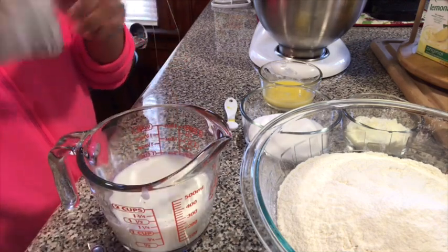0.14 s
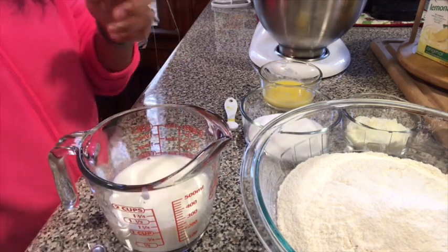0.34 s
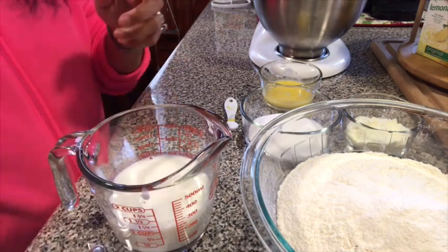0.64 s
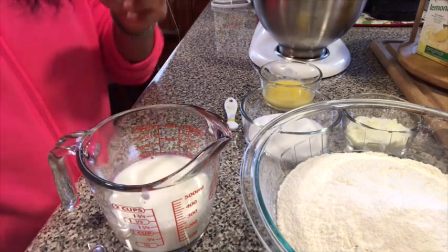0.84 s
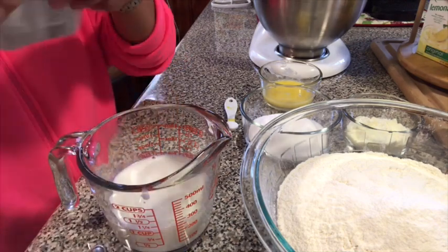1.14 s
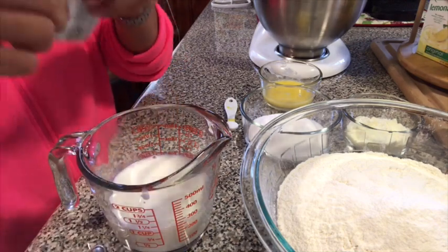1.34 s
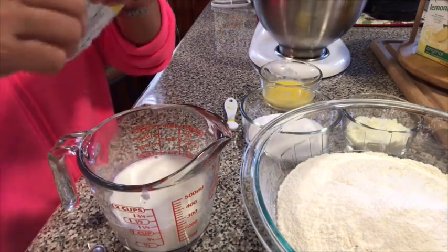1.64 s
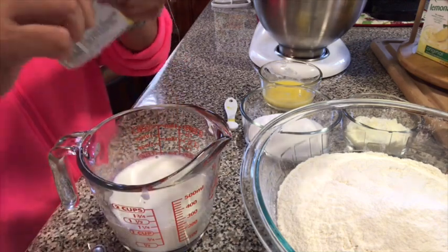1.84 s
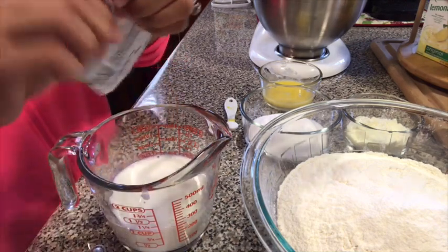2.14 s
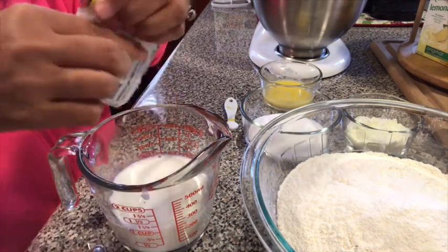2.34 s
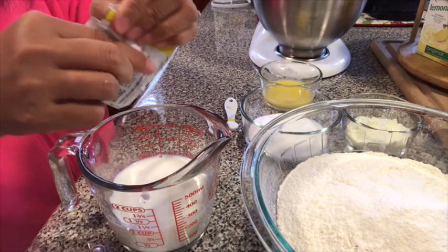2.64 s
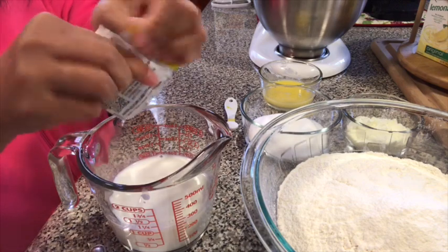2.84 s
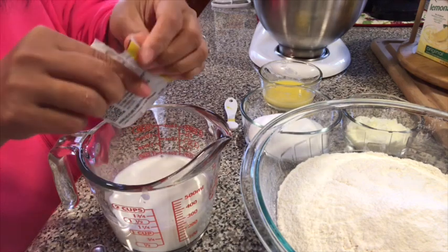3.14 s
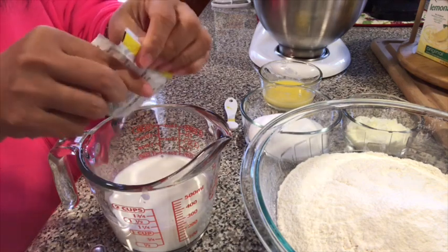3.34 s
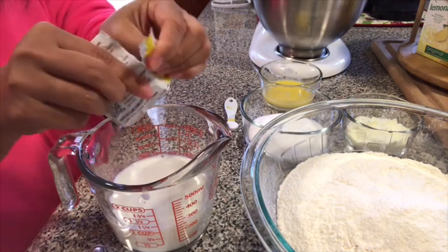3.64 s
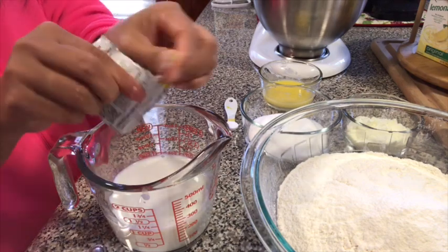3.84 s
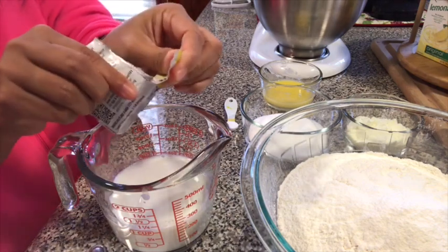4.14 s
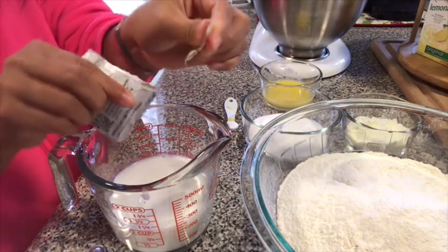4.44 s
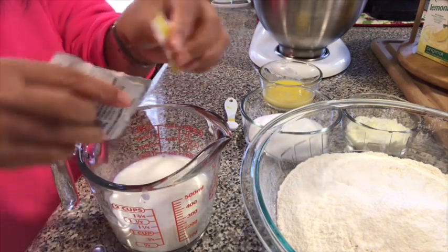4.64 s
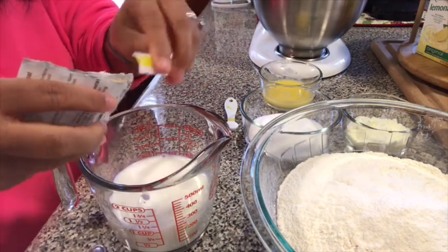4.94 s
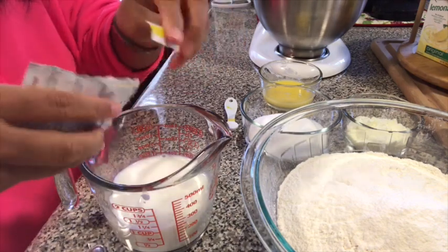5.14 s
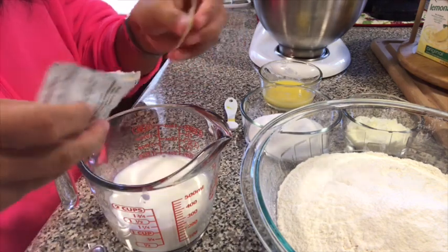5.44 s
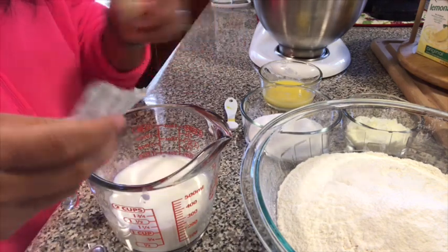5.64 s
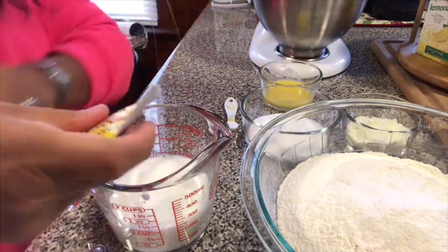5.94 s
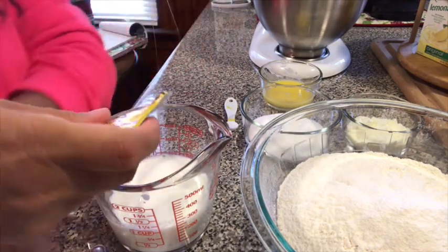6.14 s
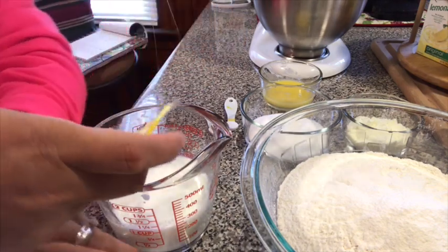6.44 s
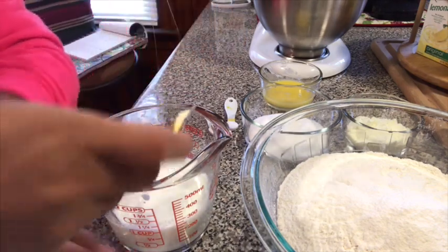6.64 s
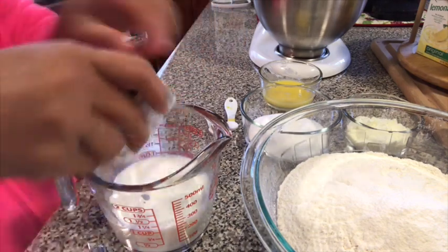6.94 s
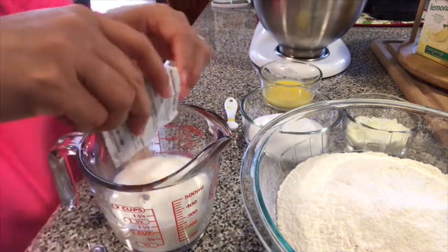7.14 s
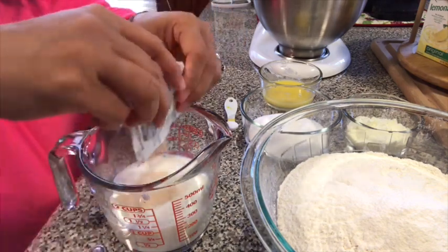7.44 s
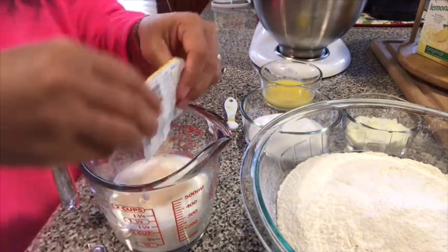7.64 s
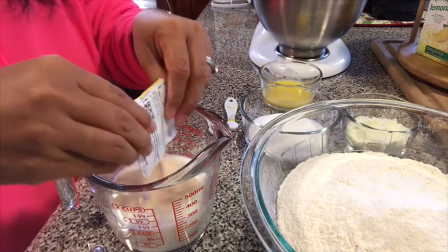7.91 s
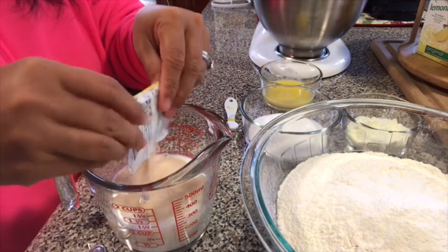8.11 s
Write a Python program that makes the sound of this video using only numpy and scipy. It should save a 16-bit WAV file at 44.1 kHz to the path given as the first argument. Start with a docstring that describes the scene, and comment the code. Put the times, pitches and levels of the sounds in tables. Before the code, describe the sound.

A paper packet is shaken hard and crackles sharply close by, then is pinched and torn in a quiet, humming kitchen before granules hiss out.

```python
"""A foil-lined paper packet is shaken, pinched and torn open close by in a quiet kitchen: creases ring the
paper as struck panels, clumps of clicks make the rustle, and three early shakes push out puffs of noise.
A faint low tone soon rises and a whine follows, to return later. In the second half a dull rumble of shaped
noise, perhaps traffic outside, swells; at the end dense ticks hiss as granules pour into a jug of milk.
Throughout, an appliance hums as a sine and its octave, beating slowly with a distant engine's gliding tone."""
import sys
import numpy as np
from scipy import signal
from scipy.fft import rfft, irfft
from scipy.io import wavfile

SR = 44100
rng = np.random.default_rng(int(sys.argv[2]) if len(sys.argv) > 2 else 0)


def wav_record(signal):
    """Record a signal, one row per channel, as 16-bit PCM in the file named by sys.argv[1]."""
    frames = np.transpose(np.atleast_2d(signal))
    bounded = np.clip(frames, -1, 1)
    # unit amplitude maps onto the largest positive 16-bit level
    quanta = np.round(bounded * 32767).astype(np.int16)
    wavfile.write(sys.argv[1], SR, quanta)


N = 364707

# louder creases snapping: (time [s], reference level [dB], panel pitch [Hz], treble re reference [dB])
CREASE_SNAPS = [(0.011, -41, 7000, -2.5), (0.0703, -36, 1600, -14), (0.1239, -39, 3200, -12),
                (0.2052, -40, 1400, -8), (0.2311, -25.5, 1640, -7.5), (.246, -17.5, 4200, -7),
                (0.2541, -14.5, 5400, -23.5), (0.3003, -23, 1700, -12), (0.3117, -19, 3500, -2),
                (0.3165, -20, 2090, -3), (.3241, -27, 3830, -12), (.3284, -15.5, 3960, -6),
                (0.3327, -6, 5270, -22), (0.414, -26, 1299, -9), (0.4386, -32, 3600, -12),
                (0.4501, -11, 4000, -3), (0.4539, -16, 3620, -12), (0.517, -23, 3200, -12),
                (0.5237, -17, 3330, -12), (0.5278, -21, 3600, -3.5), (0.5312, -8.5, 1820, -12),
                (.5424, -12, 2450, -3), (.5835, -36.5, 1900, -3), (0.6181, -25.5, 1420, -13),
                (0.6404, -21, 6300, -13.5), (0.657, -27, 4170, -12), (0.7166, -31, 2400, -14),
                (.7259, -21, 2050, -5), (0.7355, -12, 2200, -12), (.7429, -4.5, 3030, -6),
                (0.7488, -16.5, 3130, -6), (0.8193, -25.5, 1640, -3), (0.8454, -27, 1350, -12),
                (1.076, -44, 2390, -16), (1.115, -33.5, 2500, 2), (1.2653, -42.5, 1840, -14),
                (1.3012, -30.5, 2000, -18), (1.3455, -30, 2600, 7.5), (1.367, -36.5, 3000, -10),
                (1.384, -33, 5600, -14), (1.4876, -28.5, 1430, -8.5), (1.6596, -44, 2360, -13),
                (1.7555, -39.5, 2570, -6), (1.7816, -28.5, 2230, -14), (1.8164, -27, 1970, -15),
                (1.9005, -32, 3200, -2), (1.9644, -15.5, 2500, -15), (2.1537, -42, 2520, -11),
                (2.2615, -33.5, 2440, -14.5), (2.2812, -35, 6800, -0.5), (2.2979, -28.5, 2130, -15.5),
                (2.36, -44, 5600, -4.5), (2.4984, -29.5, 3000, -12.5), (2.507, -11, 3800, -13.5),
                (2.57, -41, 3400, 1), (2.6086, -44.5, 6000, 9), (2.6266, -34, 4860, -10),
                (2.7087, -27.5, 4660, -17), (2.719, -35, 5900, -2), (2.7272, -32, 5200, -12),
                (2.7575, -12.5, 2380, -2.5), (2.7866, -27, 6100, -10), (2.9706, -43, 3400, -0.5),
                (3.053, -44, 5000, -2), (3.3628, -30, 2120, -8), (3.3663, -32.5, 2830, -5),
                (3.4313, -45, 4800, -6), (3.5844, -35, 5560, 4), (3.6376, -43, 6750, 9.5),
                (3.6603, -43, 7400, 11), (3.7274, -30, 5860, -8), (3.7407, -20.5, 5800, 0),
                (3.755, -20, 3540, 1.5), (3.9688, -35, 5560, 3), (3.9775, -42, 5350, -14),
                (3.9877, -44, 4200, 7), (3.9998, -42, 4340, 4.5), (4.013, -37.5, 3900, 4),
                (4.094, -40.5, 5740, 1), (4.119, -45, 5890, -4), (4.1436, -47, 3190, 0),
                (4.1709, -27, 5160, -2), (4.1888, -27, 2750, 3), (4.2247, -29, 2570, -3),
                (4.533, -47, 1890, 4), (5.0988, -51, 6000, 5), (5.284, -51, 2900, -12),
                (5.5689, -40, 2400, -14), (5.5757, -37, 4500, -5), (6.23, -44.5, 3100, -8),
                (6.2376, -38, 5040, -18), (6.4095, -47, 6550, -12), (6.7293, -34, 2590, 0),
                (6.96, -41, 6260, -4), (7.086, -39.5, 2950, -11), (7.1123, -32, 5200, -17),
                (7.3568, -37, 1800, -12.5), (7.422, -37.5, 2710, 1.5), (7.603, -37, 2930, -12),
                (7.6235, -29, 3800, 0.5), (8.0225, -28.5, 3540, -9), (8.0506, -27.5, 1840, -6)]
# resonances of the paper: (frequency [Hz], width [Hz], relative level [dB])
PAPER_MODES = [(2570, 200, 4), (4410, 317, -9), (6380, 630, -6)]
# swells of rustling from shaking, pinching and tearing, and their fading tails;
# rise and fall are never shorter than 0.005:
# (time of the top [s], level [dB], rise [s per 20 dB], fall [s per 20 dB], body re level [dB])
RUSTLE_SWELLS = [(.02, -54, 4, .03, -10.5), (.12, -57.5, 0.2, 0.02, -19), (.24, -39, 0, 0.06, -26),
                 (0.323, -30.5, 0, .05, -5.5), (.452, -42, 0.05, .12, -14),
                 (0.537, -34.5, -0.0144, .055, -2.5), (0.654, -43, -0.08, 0.01, -5),
                 (0.739, -32, 0.02, 0.0421, -0.5), (.8, -50, 0.5, 0.1054, -4), (1.111, -57, 0.1, 0.12, -9),
                 (1.357, -57.5, 0.2, 0.22, -9), (1.488, -64, 0, .08, -6), (1.79, -59, 0.18, 0.2, 0.5),
                 (1.904, -48, 0.05, 0.08, -6.5), (1.97, -56.5, .08, .09, 4), (2.133, -64, 0.18, 0.4, -8),
                 (2.258, -55.5, 0.03, .18, -9), (2.505, -62.5, 0.06, 0.55, -12),
                 (2.735, -53, -0.07, 0.06, -25), (2.767, -38, 0.0457, 0.08, -18),
                 (2.816, -39.5, .1, -0.01, -16.5), (3.134, -67.5, 0.2, -0.1, -23),
                 (3.278, -60.5, 0.05, -1.66, -24), (3.374, -62, 0.13, -0.7, -7),
                 (3.473, -56.5, 0.17, -0.25, -14.5), (3.577, -54, 0.27, -0.18, -23),
                 (3.701, -56.5, 0.23, -0.1, -17.5), (3.754, -41.5, 0.0162, 0.0944, -11),
                 (3.802, -41, 0.0945, -0.09, -25.5), (3.985, -49.5, -0.4, 0.02, -30),
                 (4.178, -49.5, 0.1, 0.0923, -14), (4.221, -38, 0.0528, -0.08, -10.5),
                 (4.659, -74, 0.7, 0.3, -15.5), (4.86, -69, 0, 0.02, -18), (4.953, -69, 0.14, 0.3, -7),
                 (5.163, -73, -0.1, 0.26, -12.5), (5.572, -53.5, 0.01, 0.03, -12), (5.6, -78, 0.8, 1.5, 1),
                 (6.236, -78, 0.3, 0, -7), (6.306, -62.5, 0.25, 0.26, -2.5), (6.87, -73, 1.2, -6, -6)]
# pushes of air that end the shakes: (time [s], level [dB])
AIR_PUFFS = [(0.332, -44.5), (0.544, -40.5), (0.746, -39)]
# flow of granules: (time [s], level [dB], mouth ring re level [dB])
POUR_FLOW = [(6.85, -78, -21), (6.95, -57, -30), (7.11, -55, -30.5), (7.2, -58, -33), (7.55, -61, -22),
             (7.63, -51.5, -17), (7.75, -54, -19), (8.06, -49.5, -17), (8.13, -53, -26), (8.27, -51.5, -14)]
# spectrum of the granules: (frequency [Hz], relative density [dB per Hz])
GRANULE_SPECTRUM = [(800, -9.5), (1400, -12), (2500, -10.5), (2900, -2.5), (3500, -1), (4050, -6.5),
                    (4500, -4), (5200, -6.5), (6200, 1.5), (6900, -3), (7800, -8), (9200, -0.5),
                    (10900, -5), (13000, -4), (15700, -5.5)]
# reverberation time of the kitchen: (frequency [Hz], T60 [s])
REVERBERATION_TIME = [(300, 0.33), (2000, 0.44), (6000, 0.21), (14000, 0.05)]
# distant engine just below the hum: (time [s], frequency [Hz], level [dB])
ENGINE_TONE = [(0, 56.717, -82), (3.0, 56.717, -76), (3.77, 56.56, -68), (4.23, 56.75, -68),
               (4.65, 56.05, -66), (4.98, 55.63, -65), (5.27, 54.98, -64), (5.55, 55.63, -64),
               (5.89, 56.05, -64), (6.25, 56.05, -66), (6.67, 56.73, -68), (7.1, 56.27, -59),
               (7.43, 55.13, -58), (7.71, 55.26, -57), (7.96, 54.48, -57), (8.27, 54.3, -64)]
# rumble from outside: (time [s], dull roar level [dB], level of low noise near 100 Hz [dB])
RUMBLE_LEVELS = [(0, -68.5, -65), (1.5, -70.5, -69), (2.9, -73, -67), (5.3, -71, -65.5), (6.0, -66, -75.5),
                 (6.4, -63.5, -66), (7.0, -65.5, -67.5), (7.7, -65, -60), (8.27, -68, -64.5)]
# spectrum of the roar: (frequency [Hz], relative density [dB per Hz])
ROAR_SPECTRUM = [(88, -45.5), (150, -0.5), (216, -5.5), (266, 2), (331, -4), (605, -5.5), (670, -8),
                 (996, -9), (5000, -28), (6500, -57), (11000, -120)]
# rising low tone: (time [s], frequency [Hz], level [dB])
RISING_TONE = [(1.0, 85, -73), (1.4, 90, -71), (2.2, 102.8, -68.5), (2.3, 104, -100)]
# faint whine: (time [s], frequency [Hz], level [dB])
WHINE_TONE = [(2.1, 179, -82), (2.25, 184, -69), (2.7, 189.6, -72), (2.9, 184.7, -96.5),
              (6.0, 246.2, -96.5), (6.3, 243.2, -69), (7.2, 246.3, -73.5), (8.1, 237, -70),
              (8.27, 236, -84)]
# spectrum of the still air: (frequency [Hz], relative density [dB per Hz])
AIR_SPECTRUM = [(15, -39), (25, -10.5), (49, -5), (75, -2.5), (116, -7), (156, -7.5), (261, -12),
                (498, -18), (618, -15.5), (767, -23), (1000, -22.5), (2020, -25), (4930, -30), (6450, -30),
                (15700, -37.5)]

USUAL_SNAP_DB, USUAL_PANEL_HZ = -35, 3000
# Thud of a usual snap, re its reference level; harder pops and larger, lower panels thud more.
THUD_DB, THUD_PER_DB, THUD_PER_OCTAVE_DB = -29.5, 0.3957, -10.5
PANEL_DB, CRACK_DB = -5, -5.0  # re the reference level of the snap
PANEL_EDGE_RATIO = 1.43  # band edge over panel pitch
MODES_DB = -5.5
RATTLE_S, RATTLE_DB = .002, -19.5
BOUNCE_S, BOUNCE_DB = .0009, -5.5  # return from the counter or the hand
FOLD_SPREAD = .12  # shift of the modes from fold to fold [share of pitch]
BRIGHT_DB, BRIGHT_PER_BODY_DB = -4.5, -0.06  # the less body a swell has, the brighter it is
CRACKLES_PER_S, CRACKLE_DB, CRACKLE_SHARPNESS = 300, -4.5, 6.3  # sharpness: pitch over width
SHIFTING_DB, SHIFTING_HZ = 3.5, 8  # spread and rate of the changing colour
PUFF_S = 0.024  # decay to 1/e
MOUTH_HZ, MOUTH_WIDTH_HZ = 1950, 600
KITCHEN_DB = -19
HUM_HZ, HUM_DB, HUM_OCTAVE_HZ, HUM_OCTAVE_DB = 58.83, -63, 120, -76
ENGINE_OCTAVE_DB = -10
LOW_NOISE_WAVER_DB = 1.5
ROOM_AIR_DB = -67
NOTCH_HZ, NOTCH_WIDTH_HZ, NOTCH_DEPTH = 10450, 600, .5
CUTOFF_HZ = 15750


def from_db(db):
    """Level law: twenty decibels are a factor of ten in amplitude."""
    return 10 ** (np.asarray(db) / 20)


def rms_one(x):
    """Normalization: scale to unit root-mean-square amplitude."""
    return x / np.sqrt(np.mean(x ** 2) + 1e-20)


def in_time(rows):
    """Linear interpolation: a gate over the table's span, then its columns at every sample."""
    s, *columns = np.transpose(rows)
    t = np.arange(N) / SR
    gate = (t >= s[0]) & (t <= s[-1] + .01)
    return [gate] + [np.interp(t, s, c) for c in columns]


def at_hz(points, hz):
    """Logarithmic pitch: read a table on a log-frequency axis."""
    table = np.array(points)
    return np.interp(np.log(hz), np.log(table[:, 0]), table[:, 1])


def band(x, low_hz, high_hz):
    """Band limitation by a Butterworth filter."""
    edges = [low_hz, min(high_hz, .45 * SR)]
    return signal.sosfilt(signal.butter(2, edges, "band", fs=SR, output="sos"), x)


def resonance(x, hz, width_hz):
    """Damped oscillator: a two-pole resonance with gain near 1 at its top."""
    r = np.exp(-np.pi * width_hz / SR)
    poles = [1, -2 * r * np.cos(2 * np.pi * hz / SR), r * r]
    return signal.lfilter([(1 - r * r) / 2, 0, (r * r - 1) / 2], poles, x)


def drift(rate_hz):
    """Low-passed chance: slow random motion of unit rms."""
    step = 40  # samples between the slow values
    r = np.exp(-2 * np.pi * rate_hz * step / SR)
    chance = rng.standard_normal(N // step + 2002)
    slow = signal.lfilter([1], [1, -2 * r, r * r], chance)[2000:]  # the filter has settled
    return np.interp(np.arange(N) / step, np.arange(len(slow)), rms_one(slow))


def coloured(x, spectrum):
    """Spectral shaping: lay a spectrum on a white signal, cut beyond its ends, at unit rms."""
    hz = np.maximum(np.fft.rfftfreq(N, 1 / SR), 1)
    inside = (hz > spectrum[0][0] * .7) & (hz < spectrum[-1][0] * 1.3)
    return rms_one(irfft(rfft(x) * from_db(at_hz(spectrum, hz)) * inside, N))


def grains(per_s, spread_db):
    """Shot noise: random clicks of uneven size and either sign."""
    sizes = from_db(spread_db * np.minimum(rng.exponential(1, N), 4)) * rng.choice([-1, 1], N)
    return sizes * (rng.random(N) < per_s / SR) + 1e-18


def tone(rows, waver_db, octave_db=-60):
    """Phase accumulation: a sine and its octave follow a curve of pitch and wavering level."""
    on, hz, level_db = in_time(rows)
    phase = 2 * np.pi * np.cumsum(hz) / SR
    wave = np.sin(phase) + from_db(octave_db) * np.sin(2 * phase)
    return on * np.sqrt(2) * from_db(level_db + waver_db * drift(3.9)) * wave


def crease_push(length):
    """Impulsive excitation: a sharp pulse and decaying rattle, reflected once and ringing the paper."""
    t = np.arange(length) / SR
    push = from_db(RATTLE_DB) * rng.standard_normal(length) * np.exp(-t / RATTLE_S)
    push[0] = 1
    # The reflected path varies by up to half an octave either way.
    lag = round(BOUNCE_S * SR * 2 ** (.5 * np.tanh(rng.standard_normal())))
    push[lag:] = push[lag:] + from_db(BOUNCE_DB) * push[:-lag]
    shifts = np.exp(FOLD_SPREAD * rng.standard_normal(len(PAPER_MODES)))
    modes = sum(from_db(level_db) * resonance(push, hz * shift, width)
                for (hz, width, level_db), shift in zip(PAPER_MODES, shifts))
    return push + from_db(MODES_DB) * modes


def snaps():
    """Struck panel: each popping crease rings its panel, with crack, treble and a low thud."""
    length = 1600
    out = np.zeros(N + length)
    for s, reference_db, hz, treble_db in CREASE_SNAPS:
        force_db = reference_db - USUAL_SNAP_DB
        octaves = np.log2(hz / USUAL_PANEL_HZ)
        thud_db = THUD_DB + THUD_PER_DB * force_db + THUD_PER_OCTAVE_DB * octaves
        push = crease_push(length)
        panel = band(push, hz / PANEL_EDGE_RATIO, hz * PANEL_EDGE_RATIO)
        crack = band(band(push, 900, 6500), 600, 9000)
        treble = band(push, 6500, 13500)
        thud = band(push, 200, 1000)
        gains = from_db(reference_db + np.array([PANEL_DB, CRACK_DB, treble_db, thud_db]))
        at = round(s * SR)
        for gain, part in zip(gains, (panel, crack, treble, thud)):
            out[at:at + length] += gain * part / np.abs(part).max()
    return out[:N]


def rustle_gains():
    """Exponential growth and decay: summed powers of swells and tails, as whole, top and body gains."""
    t = np.arange(0, N, 32) / SR
    power = 0
    for s, level_db, rise_s, fall_s, body_db in RUSTLE_SWELLS:
        drop = np.maximum((s - t) / max(rise_s, .005), (t - s) / max(fall_s, .005))
        bright_db = BRIGHT_DB + BRIGHT_PER_BODY_DB * body_db
        power = power + from_db(level_db - 20 * drop + np.array([[0], [bright_db], [body_db]])) ** 2
    return [np.interp(np.arange(N) / SR, t, np.sqrt(p)) for p in power]


def shifting(x):
    """Changing resonance: as paper bends, third-octave bands swell and sink independently."""
    edges = np.geomspace(800, 16000, 14)
    out = 0
    for k, (low, high) in enumerate(zip(edges, edges[1:])):
        gain = from_db(SHIFTING_DB * drift(SHIFTING_HZ))
        out = out + gain * band(x, low, high) * (-1) ** k  # signs alternate from band to band
    return out


def crackles():
    """Resonator bank: small creases pop at 16 pitches; returns the low and high ones."""
    pops, dealt = grains(CRACKLES_PER_S, 1.5), rng.integers(0, 16, N)
    small = np.array([resonance(pops * (dealt == k) + 1e-18, hz, hz / CRACKLE_SHARPNESS)
                      for k, hz in enumerate(np.geomspace(1300, 14000, 16))])
    return [from_db(CRACKLE_DB) * rms_one(part.sum(axis=0)) for part in np.split(small, [11])]


def rustle():
    """Stick-slip friction: fibres slip and part in clumps of tiny clicks that ring the paper."""
    level, bright, low = rustle_gains()
    clumps = grains(2600 * from_db(4.6 * drift(54)), 2.4)
    clicks = shifting(rms_one(clumps) + 0.19 * rng.standard_normal(N))
    mid = band(clicks, 2300, 8500)
    mid = mid + sum(from_db(level_db) * resonance(clicks, hz, width) for hz, width, level_db in PAPER_MODES)
    top = band(clicks, 6000, 14500)
    body = band(clicks, 850, 2300)
    low_pops, high_pops = crackles()
    return level * (rms_one(mid) + low_pops) + bright * (rms_one(top) + high_pops) + low * rms_one(body)


def puffs():
    """Turbulent air: dull noise starts at once and decays exponentially."""
    t = np.arange(N) / SR
    shape = sum(from_db(level_db) * (t >= s) * np.exp(-np.maximum(t - s, 0) / PUFF_S)
                for s, level_db in AIR_PUFFS)
    return shape * rms_one(band(rng.standard_normal(N), 40, 1000))


def pour():
    """Granular flow: dense ticks along the paper excite the resonance of the packet's open mouth."""
    on, level_db, mouth_db = in_time(POUR_FLOW)
    ticks = rms_one(grains(12000, 2.6)) * from_db(1.0 * drift(38))
    mouth = resonance(ticks, MOUTH_HZ, MOUTH_WIDTH_HZ)
    mouth = rms_one(resonance(mouth, MOUTH_HZ, MOUTH_WIDTH_HZ))
    return on * from_db(level_db) * (coloured(ticks, GRANULE_SPECTRUM) + from_db(mouth_db) * mouth)


def kitchen(x, build_up_s=0.0027):
    """Diffuse reverberation: octave bands of noise build up, then decay each at its own rate."""
    t = np.arange(int(.5 * SR)) / SR
    noise = rng.standard_normal((2, len(t)))
    tail = 0
    for k, low in enumerate(150 * 2.0 ** np.arange(7)):
        decay = from_db(-60 * t / at_hz(REVERBERATION_TIME, 1.4 * low))
        tail = tail + band(noise[k % 2], low, 2 * low) * decay
    tail = tail * (1 - np.exp(-t / build_up_s))
    return signal.fftconvolve(x, tail / np.sqrt(np.sum(tail ** 2)))[:N]


def appliance_hum():
    """Periodic vibration: a wavering sine with a steady tone about an octave above."""
    turn = 2 * np.pi * np.arange(N) / SR
    low = from_db(HUM_DB + 1.7 * drift(5.4)) * np.sin(HUM_HZ * turn)
    octave = from_db(HUM_OCTAVE_DB) * np.sin(HUM_OCTAVE_HZ * turn)
    return np.sqrt(2) * (low + octave)


def distant_engine():
    """Beating: a gliding tone and its octave lie close to the hum and interfere with it."""
    return tone(ENGINE_TONE, 1.1, ENGINE_OCTAVE_DB)


def outside_rumble():
    """Filtered noise: a dull roar, and a narrow band of low noise that wavers at random."""
    _, roar_db, low_noise_db = in_time(RUMBLE_LEVELS)
    roar = from_db(roar_db) * coloured(rng.standard_normal(N), ROAR_SPECTRUM)
    low_noise = rms_one(band(rng.standard_normal(N), 85, 120))
    return roar + from_db(low_noise_db + LOW_NOISE_WAVER_DB * drift(1.5)) * low_noise


def faint_tones():
    """Frequency glide: a rising low tone and a whine that comes twice."""
    return tone(RISING_TONE, 1.7) + tone(WHINE_TONE, 2.0)


def room_air():
    """Stationary noise: still air has a steady, mostly low spectrum."""
    return from_db(ROOM_AIR_DB) * coloured(rng.standard_normal(N), AIR_SPECTRUM)


def scene():
    """Superposition: the packet, its reflections and the background add."""
    packet = snaps() + rustle() + puffs() + pour()
    background = appliance_hum() + distant_engine() + outside_rumble() + faint_tones() + room_air()
    return (packet + from_db(KITCHEN_DB) * kitchen(packet) + background)[None]


def record(dry):
    """Linear filtering: the microphone port dips near 10 kHz and the top is cut."""
    dry = dry - NOTCH_DEPTH * resonance(dry, NOTCH_HZ, NOTCH_WIDTH_HZ)
    return signal.sosfilt(signal.ellip(12, .5, 70, CUTOFF_HZ, fs=SR, output="sos"), dry)


dry = scene()
out = record(dry)
wav_record(out)
```